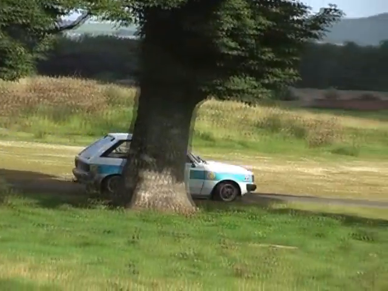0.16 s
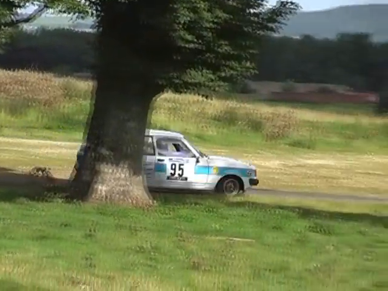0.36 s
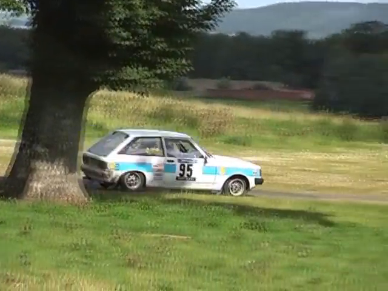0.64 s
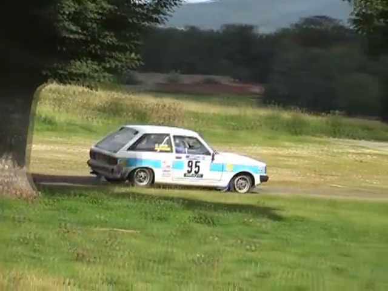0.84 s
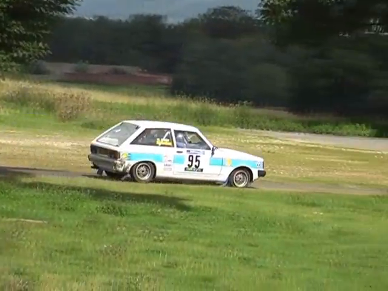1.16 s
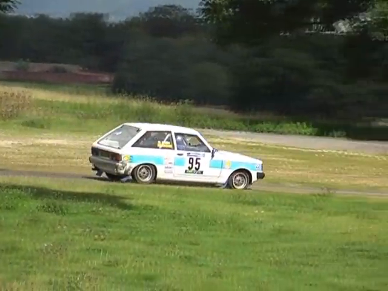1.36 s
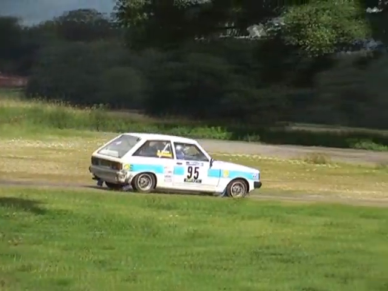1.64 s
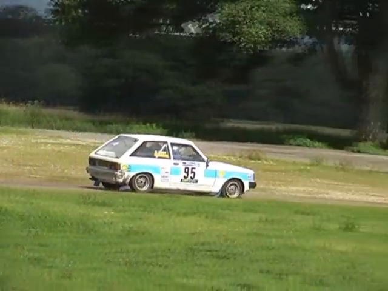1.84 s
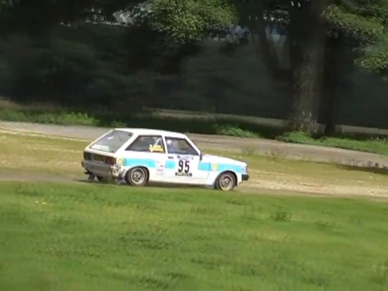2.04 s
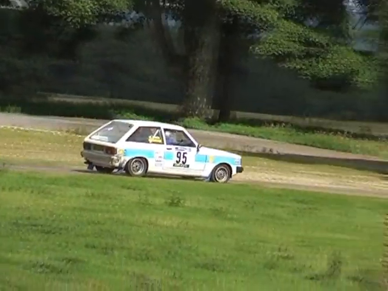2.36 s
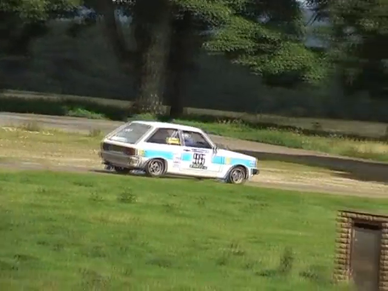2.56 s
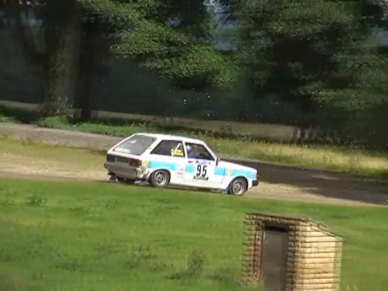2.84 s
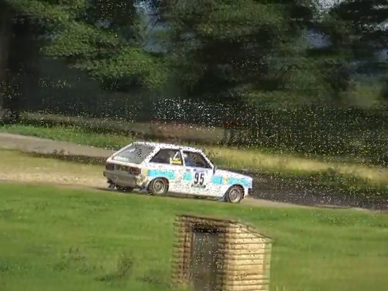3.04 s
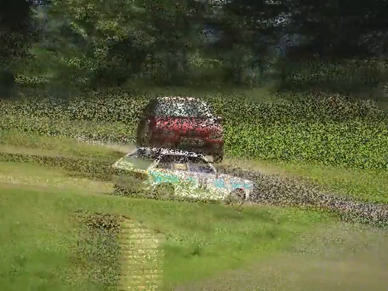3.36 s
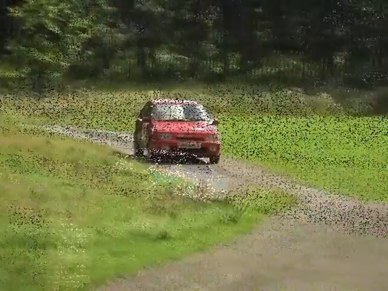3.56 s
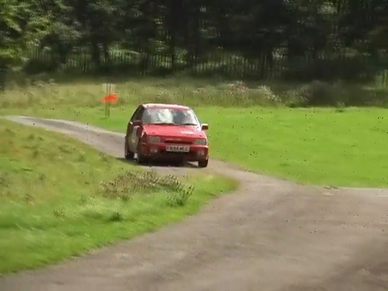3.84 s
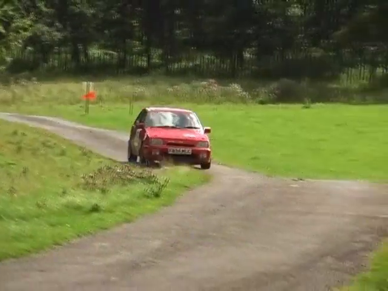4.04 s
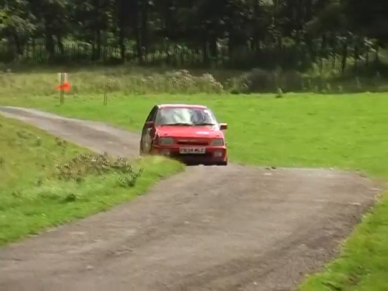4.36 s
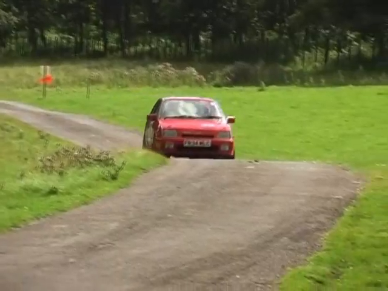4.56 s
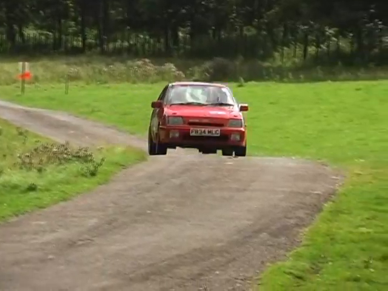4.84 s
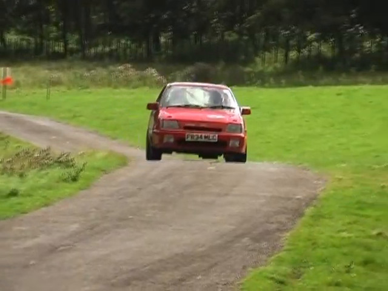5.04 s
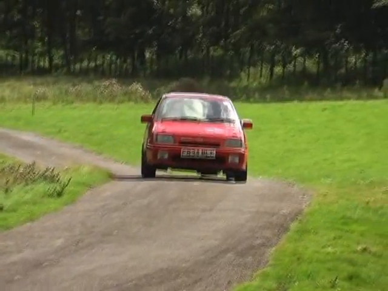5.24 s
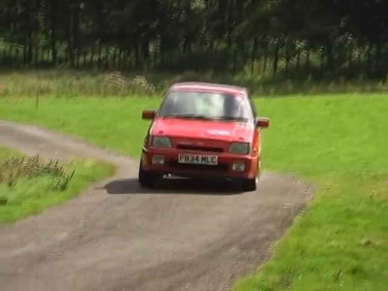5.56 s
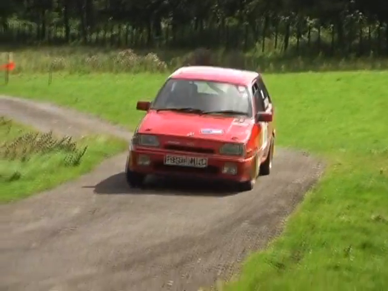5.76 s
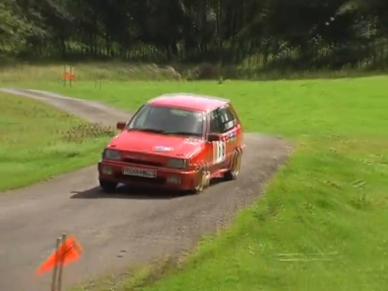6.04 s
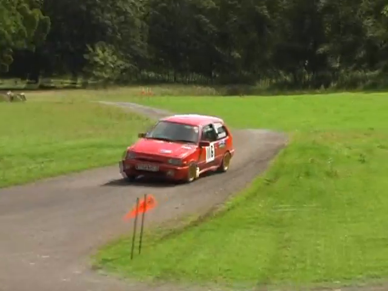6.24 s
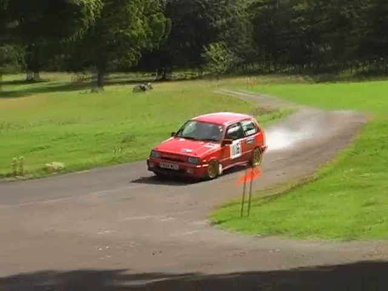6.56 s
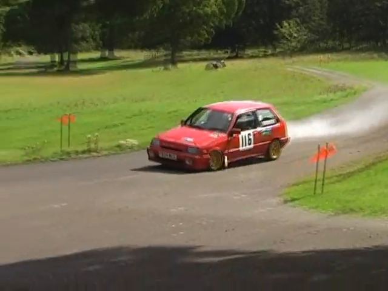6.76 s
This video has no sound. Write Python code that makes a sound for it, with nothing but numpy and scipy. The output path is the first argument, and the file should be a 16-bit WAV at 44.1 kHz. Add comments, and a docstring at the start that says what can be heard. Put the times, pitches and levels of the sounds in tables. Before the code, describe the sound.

A rally car crackles and surges away over gravel, then a second engine nears, lifts off, and its tyres scrub and squeal through a corner.

```python
"""A parkland rally stage: one car slides on gravel with surging revs and pulls away as a second comes on at full
throttle, lifts, brakes and scrubs its tyres into a tarmac corner with a squeal.
Engines are sums of tones locked to the firing rate plus ringing metal; the road and wind are coloured noise.
Stones are short cracks, squeals and yelps are brief tones. A camera microphone with two close ports hears it all."""
import sys
import numpy as np
from scipy import signal
from scipy.fft import rfft, irfft, next_fast_len
from scipy.io import wavfile
from scipy.ndimage import uniform_filter1d

SR = 44100
rng = np.random.default_rng(int(sys.argv[2]) if len(sys.argv) > 2 else 0)


def master_out(mix):
    """Clip the mix to full scale and print it as 16-bit PCM to the path in sys.argv[1]."""
    frames = np.transpose(np.atleast_2d(mix))
    ceiling = np.clip(frames, -1, 1)
    pcm = np.round(ceiling * 32767).astype(np.int16)
    wavfile.write(sys.argv[1], SR, pcm)


N = 304270
T = np.arange(N) / SR  # time of every sample, s
SIZE = next_fast_len(N)  # length of the Fourier transforms
SIDES = np.array([[1], [-1]])  # left, right


def undb(db):
    """Turn decibels into a gain."""
    return 10 ** (np.asarray(db) / 20)


def unit(x):
    """Scale to an RMS of 1."""
    return x / np.sqrt(np.mean(x ** 2))


def columns(table):
    """Every column after the time, as a curve over all samples."""
    s, *rest = np.transpose(table)
    return [np.interp(T, s, column) for column in rest]


def gate(table, fade_s):
    """1 while the table lasts, fading to 0 outside."""
    first, last = table[0][0], table[-1][0]
    return np.interp(T, [first - fade_s, first, last, last + fade_s], [0, 1, 1, 0])


def walk(rate):
    """Random levels, each held 1 / rate seconds, then smoothed twice; RMS 1."""
    k = int(SR / rate)
    steps = np.repeat(rng.standard_normal(N // k + 1), k)
    return unit(uniform_filter1d(uniform_filter1d(steps, k), k)[:N])


def response(shape, lo_hz, hi_hz, rings):
    """The part of a spectrum between two soft edges, with its resonances, passing unit power."""
    f = np.maximum(np.arange(SIZE // 2 + 1) * SR / SIZE, 1)
    hz, db = np.transpose(shape)
    edges = 1 / np.sqrt((1 + (lo_hz / f) ** 8) * (1 + (f / hi_hz) ** 8))
    lift_db = sum(top_db / (1 + (2 * (f - ring_hz) / width) ** 2) for ring_hz, width, top_db in rings)
    return unit(edges * undb(np.interp(np.log(f), np.log(hz), db) + lift_db))


def colour(x, shape, lo_hz, hi_hz, rings=()):
    """Filter unit noise, one row or several."""
    return irfft(rfft(x, SIZE) * response(shape, lo_hz, hi_hz, rings), SIZE)[..., :N]


def grains(rate, spread_db):
    """Scattered impacts of uneven size, about `rate` a second."""
    hit = rng.random(N) < rate / SR
    size_db = spread_db * np.minimum(rng.exponential(1, N), 4)
    return unit(hit * rng.standard_normal(N) * undb(size_db))


def firing_cycle(table):
    """Count of firings so far: the firing rate added up over time."""
    return np.cumsum(columns(table)[0]) / SR


# How unevenly the engines fire, rough when the throttle shuts.
# Each row: time in seconds, roughness from 0 to 1.
ROUGHNESS = [(0, .1), (.24, .1), (.3, .5), (.56, .45), (.62, .12), (1.05, .12), (1.15, .25), (1.3, .14),
             (2.1, .16), (2.5, .08), (4.2, .08), (4.3, .26), (5.1, .1), (5.6, .2)]


def exhaust(table, orders, half_db):
    """Multiples (orders) of the firing rate; firings differ in strength and timing, uneven cylinders add half orders."""
    rough, = columns(ROUGHNESS)
    cycle = firing_cycle(table)
    note = 0
    for k, db in orders:
        size, slip = (np.interp(cycle, np.arange(1500), c) for c in rng.standard_normal((2, 1500)))
        scatter = rough * min(0.33 * k, 1)  # the lowest order averages over the whole pulse
        strength = undb(db) * (1 + 2.15 * scatter * size)
        note = note + strength * np.sin(2 * np.pi * k * cycle + 3.05 * scatter * slip)
    body = np.sqrt(sum(undb(db) ** 2 for k, db in orders))
    for k in (1.5, 2.5, 3.5):
        size, slip = (np.interp(cycle / 2, np.arange(800), c) for c in rng.standard_normal((2, 800)))
        note = note + body * undb(half_db + 5.4 * rough) * size * np.sin(2 * np.pi * k * cycle + slip)
    note = np.sqrt(2) * note * gate(table, 0.051)
    # short tail pipes radiate little below their first order
    return signal.sosfilt(signal.butter(4, 62, "high", fs=SR, output="sos"), note)


def rasp(cycle, table, box, spread_db):
    """Each firing is a knock of its own strength that rings hollow metal; the rattle comes and goes."""
    size = rng.standard_normal((1500, 2))[cycle.astype(int)].T
    fires = np.diff(np.floor(cycle), prepend=0) > 0
    knocks = fires * undb(spread_db * size[0])
    puff = rng.standard_normal(N) * np.exp(-(cycle % 1) / 0.54)  # noise fading after each firing
    knocks = knocks + 0.11 * puff * undb(spread_db * size[1])
    ring = 0
    for hz, width, db in box:
        ring = ring + undb(db) * unit(signal.lfilter(*signal.iirpeak(hz, hz / width, fs=SR), knocks))
    return unit(ring) * undb(columns(table)[0]) * undb(3.6 * walk(30)) * gate(table, .05)


# The engine of the leaving car.
# Each row: time in seconds, firing rate in Hz, level in dB before the pipe, lift of the 2nd order in dB.
LEAVING_REVS = [(0.0, 89.9, -38.5, 18.5), (0.136, 116.9, -20, 2.5), (0.222, 137, -29.5, 13.5),
                (0.27, 136.8, -29, -16), (0.434, 138.7, -32, -2), (0.54, 150, -26.5, 4),
                (0.64, 161.2, -22.5, 7.5), (0.72, 151.1, -22.5, 0.5), (0.792, 125.3, -25, 6.5),
                (0.898, 112.4, -21, 7), (1.062, 81, -30, 14.5), (1.14, 66.8, -22, -4),
                (1.2, 71.74, -24, 3.5), (1.26, 79.2, -25, 7.5), (1.408, 87.8, -29.5, 9.5),
                (1.506, 92.54, -17, 0.5), (1.68, 74.7, -28.5, 11), (1.834, 88.4, -19, -0.5),
                (1.996, 79.5, -26, 11.5), (2.084, 93.2, -16.5, -11.5), (2.2, 87.3, -21, -1.5),
                (2.33, 91.6, -16.5, -13), (2.544, 96.75, -17.5, 4), (2.832, 103.4, -18.5, -7),
                (3.128, 110.9, -23, -9.5), (3.3, 115.4, -24.5, 5), (3.4, 117, -24, -4),
                (3.798, 126.5, -28.5, 4.5), (4.06, 134.9, -42.5, 4)]
# The throttle is lifted for an instant. Each row: middle in seconds, length in seconds, change in dB.
THROTTLE_LIFTS = [(.28, 0.071, -10), (0.422, 0.11, -12), (1.143, 0.078, -7), (1.436, 0.058, -16)]
# Extra level of the orders above the third. Each row: time in seconds, gain in dB.
UPPER_ORDERS = [(0, -1), (.45, -3), (.6, 8), (.8, 1), (1.2, -3.5), (2, 1.5), (2.5, 3), (3.0, 5), (3.5, 1.5),
                (4.06, 6)]
# How well the pipe passes an order. Each row: frequency of the order in Hz, gain in dB.
PIPE_GAIN = [(60, 1), (85, -15), (110, -5.5), (140, -2.5), (170, -3), (205, -4), (240, -0.4), (280, -4.5),
             (320, -9.5), (370, -23), (500, -32), (640, -37), (780, -36.5), (920, -65)]


def leaving_orders(count):
    """Each order is as loud as the pipe passes it at its frequency; all drop when the throttle is lifted."""
    hz, db, second_db = columns(LEAVING_REVS)
    for s, length, depth_db in THROTTLE_LIFTS:
        db = db + depth_db * np.exp(-((T - s) / length * 2) ** 2)
    bright_db, = columns(UPPER_ORDERS)
    pipe_hz, pipe_db = np.transpose(PIPE_GAIN)
    orders = []
    for k in range(1, count + 1):
        passed_db = np.interp(np.log(k * hz), np.log(pipe_hz), pipe_db)
        orders.append((k, db + passed_db + (k == 2) * second_db + (k > 3) * bright_db))
    return orders


# Rasp of the firings in the silencer and engine bay. Each row: time in seconds, level in dB.
LEAVING_RASP_LEVEL = [(0, -56), (.45, -60), (.52, -40), (.74, -40), (.82, -42), (1.0, -48), (1.15, -54),
                      (1.8, -59), (2.2, -46.5), (3, -53), (3.8, -68)]
# The metal that rings. Each row: pitch in Hz, width in Hz, strength in dB against the other rings.
LEAVING_METAL = [(770, 32, 5.1), (1090, 65, 1.3), (1341, 52, 7), (1603, 87, 1.3)]


def leaving_engine():
    """The leaving car: exhaust orders and the rasp of metal struck at the same firing rate."""
    note = exhaust(LEAVING_REVS, leaving_orders(count=8), half_db=-37.0)
    return note + rasp(firing_cycle(LEAVING_REVS), LEAVING_RASP_LEVEL, LEAVING_METAL, spread_db=4.4)


# The engine of the coming car.
# Each row: time in seconds, firing rate in Hz, exhaust level in dB, intake howl in dB.
COMING_REVS = [(2.95, 147.2, -47, -67), (3.172, 146.8, -39, -55), (3.554, 151.1, -28, -58),
               (3.8, 154.7, -25.5, -53), (4.112, 155.1, -20, -43.5), (4.22, 155.7, -25.5, -39),
               (4.25, 155.7, -45, -43), (4.346, 152.4, -34, -50), (4.568, 152.4, -44.5, -51.5),
               (4.9, 147.6, -40, -55), (5.05, 140.8, -33.5, -62), (5.22, 133.4, -32, -66),
               (5.29, 126.9, -24, -65), (5.37, 121, -33, -64), (5.492, 112.2, -35, -63),
               (5.6, 105, -45, -66), (5.72, 97.6, -36.5, -66), (5.9, 89.3, -60, -64)]

# Both cars on gravel, then rolling on tarmac.
# Each row: time in seconds, level in dB, lower middle over it in dB, treble over it in dB (scaled per layer).
ROAD_LEVEL = [(0, -50, 3.5, -3), (.23, -46, 3, -8.5), (.39, -44.5, -3, -6), (.52, -41, 2.5, -5.5),
              (.7, -41.5, 3.5, -6.5), (.98, -41, 1, -6), (1.15, -47, 1, -7), (1.57, -43, 1, -3),
              (1.74, -46.5, 0.5, -3), (1.77, -38.5, -1, -5.5), (1.96, -45, 2.5, -6), (2.01, -48, 1.5, 0),
              (2.06, -43, 3, -6), (2.7, -45, 1.5, -5), (2.9, -46, 2, -9.5), (3.61, -49, 3, -9),
              (4.18, -46, 6, -16), (4.36, -47.5, 3.5, -15), (4.8, -46.5, 4, -15.5), (5.07, -40.5, 1, -11.5),
              (5.4, -35.5, -0.5, -10.5), (5.58, -38, 2, -14.5), (5.81, -35.5, 0.5, -15),
              (5.86, -30, 1.5, -18)]
# The coming car sliding into the corner. Each row: the same four columns.
SKID_LEVEL = [(5.87, -30, -4, -18), (5.884, -23, -4, -21.5), (5.966, -27, -1, -12.5),
              (6.004, -21, -6.5, -16), (6.012, -29.5, 0, -15.5), (6.106, -28.5, 0, -10.5),
              (6.138, -32, 0, -3.5), (6.204, -28.5, 3, -5), (6.308, -25.5, 1, -6), (6.328, -20.5, -11, -16),
              (6.348, -29.5, 3, -7.5), (6.434, -26, 3.5, -10), (6.584, -34, 7, -5), (6.642, -31, 1.5, -7),
              (6.762, -30, 2, -4), (6.792, -27, -4, -8), (6.84, -29.5, 1, -13), (6.9, -35.5, 12.5, -5)]
# The deep rumble. Each row: time in seconds, level in dB.
RUMBLE_LEVEL = [(0, -33), (.3, -31), (.54, -36.5), (.94, -31), (1.5, -32), (1.76, -29.5), (2, -33),
                (2.87, -29), (3.6, -38), (5.4, -38.5), (5.58, -34), (5.81, -34), (5.88, -32), (6.02, -34.5),
                (6.2, -26.5), (6.5, -28), (6.7, -33.5), (6.9, -31.5)]
# Colours of the noise: the rumble, then the road on gravel, rolling on tarmac and sliding on tarmac.
# Each row: frequency in Hz, relative strength per Hz in dB.
RUMBLE_COLOUR = [(18, -51), (30, -42), (64, -8), (96, 1), (192, 9), (333, 2.5), (600, -10.5)]
GRAVEL_COLOUR = [(260, -48), (450, -16), (499, -2), (662, 0), (791, -5), (878, -6), (1030, -3), (1330, -5),
                 (1790, -7.5), (2670, -6), (3600, -14), (7020, -20.5), (7780, -27.5), (11000, -25.5),
                 (15600, -38)]
ROLLING_COLOUR = [(260, 3), (450, 0.5), (606, -11.5), (672, -7.5), (918, -8), (1110, -4.5), (1820, -13),
                  (2110, -10.5), (3990, -22), (6140, -21), (8020, -30.5), (9730, -27), (13100, -33),
                  (14100, -40), (15600, -48)]
SLIDING_COLOUR = [(260, 15), (450, 3), (588, -7.5), (682, -2), (1080, -1), (1230, -6), (3440, -15),
                  (3990, -14), (4560, -16), (5700, -16), (7900, -23.5), (12200, -20), (15600, -31)]
# Rings of hollow bodywork in the road noise. Each row: pitch in Hz, width in Hz, lift in dB.
GRAVEL_BODY = [(800, 35, 2.5), (1387, 53, 3.5), (2710, 200, 3)]
ROLLING_BODY = [(1110, 34, 2.7), (9900, 550, 3)]


def road():
    """Rumble and four bands of tread roar; bumps and showers of grit shake them, exhaust gas pulses the lower two."""
    tarmac_s, slide_s, turn_s = 3.88, 5.86, 5.97  # middle of the change to tarmac, start of slide, start of turn
    tarmac = np.clip(T - tarmac_s + .5, 0, 1)
    slide = np.clip((T - slide_s) / 0.016, 0, 1)
    turn = np.clip((T - turn_s) / 0.25, 0, 1)
    loose = 1 - 0.63 * tarmac * (1 - slide)  # rolling on tarmac is shaken least
    road_db, lower_db, treble_db = columns(ROAD_LEVEL + SKID_LEVEL)
    rumble_db, = columns(RUMBLE_LEVEL)
    bumps = walk(8.7)
    grit_tail = np.exp(-1 / (0.0098 * SR))  # each shower of grit dies away in about 10 ms
    showers = unit(signal.lfilter([1], [1, -grit_tail], np.abs(grains(70, 2.8))))
    leaving_gas = 1 + 0.066 * (1 - slide) * np.cos(2 * np.pi * firing_cycle(LEAVING_REVS))
    coming_gas = 1 + 0.077 * (1 - slide) * np.cos(2 * np.pi * firing_cycle(COMING_REVS))
    mid, side = colour(rng.standard_normal((2, N)), RUMBLE_COLOUR, 20, 444)
    out = undb(rumble_db + 0.34 * walk(13)) * (mid + undb(-22.5) * side * SIDES)
    # Scrub, hiss, spray and grit. Each row: added level in dB, then its offsets in dB on gravel, rolling and
    # sliding, edges in Hz, impacts a second, their share when sliding, bumps in dB, showers' share,
    # side against middle in dB, left minus right in dB
    layers = [
        (lower_db, (0.69, 0.93, 2.1), 500, 1850, 350, .65, .4, .06, -21, -.2),
        (0, (-2.3, -2.2, -2.1), 1850, 3900, 700, .5, .4, .12, -16, -.6),
        (0.73 * treble_db, (-1.8, -3.3, -3.6), 4000, 7500, 1200, .5, .4, .22, -6.5, -.3),
        (1.47 * treble_db, (-1.4, -1, -0.89), 7500, 17000, 700, .8, .4, .3, -6.5, 2.2)]
    for over_db, offsets_db, lo_hz, hi_hz, rate, share, bump_db, shower, side_db, lean_db in layers:
        gravel_db, rolling_db, sliding_db = offsets_db
        surface_db = gravel_db + (rolling_db - gravel_db) * tarmac + (sliding_db - rolling_db) * slide
        db = road_db + over_db + surface_db
        rush = rng.standard_normal((2, N))
        impacts = np.array([grains(rate, 0.44), grains(rate, 1.5)])
        crunch = (rush + share * impacts) / np.sqrt(1 + share ** 2)
        pulse = (leaving_gas, coming_gas) if hi_hz < 5000 else (1, 1)
        on_gravel = colour(rush * pulse[0], GRAVEL_COLOUR, lo_hz, hi_hz, GRAVEL_BODY)
        rolling = colour(rush[:, ::-1] * pulse[1], ROLLING_COLOUR, lo_hz, hi_hz, ROLLING_BODY)
        # the road mirrors the sliding tyres, leaving a dip (Hz, width in Hz, dB) that is higher after the turn
        before_turn = colour(crunch, SLIDING_COLOUR, lo_hz, hi_hz, [(3800, 440, -14)])
        after_turn = colour(crunch, SLIDING_COLOUR, lo_hz, hi_hz, [(4080, 260, -9)])
        mid, side = (np.sqrt(1 - tarmac) * on_gravel + np.sqrt(tarmac) * (1 - slide) * rolling
                     + slide * (1 - turn) * before_turn + turn * after_turn)
        shake = undb(loose * bump_db * bumps) * (1 - shower * loose + shower * loose * showers)
        out = out + (mid + undb(side_db) * side * SIDES) * shake * undb(db + lean_db / 2 * SIDES)
    return out


# Strength of the wind. Each row: time in seconds, level in dB of the part both ports share.
WIND_LEVEL = [(0, -52), (2.5, -57), (5.2, -68), (6, -57), (6.5, -48), (6.9, -46)]


def wind():
    """Slow low buffeting as deep noise, partly different at the two ports."""
    db, = columns(WIND_LEVEL)
    mid, side = colour(rng.standard_normal((2, N)), [(10, -2), (40, 2), (90, 1.2)], 8, 89)
    return undb(db) * (mid + .5 * side * SIDES)


# Single firings popping in the pipe while the throttle is shut.
# Each row: start in seconds, peak in dB, ring in Hz.
PIPE_POPS = [(0.315, -18, 166), (.335, -24, 170), (.36, -25, 172), (.404, -23, 151), (.446, -24, 190),
             (.476, -21, 150), (0.522, -15, 200), (.561, -17, 200)]


def pops():
    """Each pop swells within a cycle and rings out in the pipe."""
    out, t = np.zeros(N), np.arange(3000) / SR
    for s, db, hz in PIPE_POPS:
        turns = hz * t / 1.6  # a longer swell for a larger divisor
        swell = 2 * turns * np.exp(1 - 2 * turns)
        out[int(s * SR):int(s * SR) + 3000] += undb(db) * swell * np.sin(2 * np.pi * hz * t)
    return out


# Brake squeaks. Each row: middle in seconds, peak in dB, pitch in Hz, length in seconds.
BRAKE_SQUEAKS = [(0.458, -47.5, 10300, 0.037), (5.42, -46, 13980, 0.029)]


def squeaks(waver):
    """Brief brake whistles that swell and fade, with an unsteady pitch."""
    drift = np.cumsum(1 + waver * walk(150)) / SR
    out = 0
    for s, db, hz, length in BRAKE_SQUEAKS:
        swell = np.exp(-((T - s) / length * 2) ** 2)
        out = out + undb(db) * swell * np.sin(2 * np.pi * hz * drift)
    return out


# Thrown stones. Each row: start in seconds, level in dB, ring in Hz, left minus right in dB.
THROWN_STONES = [(0.495, -32, 5030, 0.5), (1.0985, -30, 5700, -2), (1.2263, -37, 4500, 0.5),
                 (1.6708, -35, 4786, 1.0), (1.737, -31, 10800, 1.5), (1.7603, -34, 4900, -2),
                 (1.8497, -33, 5000, 0.0), (1.9015, -34, 5650, 0.0), (2.0072, -33, 4360, 1.0),
                 (2.139, -38, 4310, -0.5), (2.6845, -33, 4614, 0.5), (2.8335, -30, 7130, 4),
                 (3.52, -39.5, 6950, 4), (5.8236, -41, 4500, -7), (6.121, -19, 4640, 2),
                 (6.166, -19, 5800, -1), (6.307, -25, 6160, -.6), (6.736, -19.5, 4300, -2),
                 (6.863, -20.5, 5100, -1.5)]


def stones():
    """Each stone cracks on the bodywork: a short hiss and a damped ring."""
    out, t = np.zeros((2, N + 2000)), np.arange(2000) / SR
    band = signal.butter(1, [3500, 11000], "band", fs=SR)
    hisses = signal.lfilter(*band, rng.standard_normal((len(THROWN_STONES), 2, 2000)))
    for (s, db, hz, pan_db), hiss in zip(THROWN_STONES, hisses):
        burst = (hiss[0] + .5 * hiss) * 0.55 * np.exp(-t / 0.0035)
        ring = 0.39 * np.sin(2 * np.pi * hz * t) * np.exp(-t / 0.0067)
        out[:, int(s * SR):int(s * SR) + 2000] += (burst + ring) * undb(db + pan_db / 2 * SIDES)
    return out[:, :N]


# Low orders of the coming car. Each row: order, gain in dB over the exhaust level.
EXHAUST_ORDERS = [(1, 0), (2, -20.5)]
# Its high orders. Each row: order, gain in dB over the intake howl.
HOWL_ORDERS = [(3, -6), (4.5, -3), (5, -6), (5.5, -4.5)]


def coming_orders():
    """Low orders follow the exhaust level, high ones the intake howl."""
    hz, db, howl_db = columns(COMING_REVS)
    low = [(k, db + gain_db) for k, gain_db in EXHAUST_ORDERS]
    return low + [(k, howl_db + gain_db) for k, gain_db in HOWL_ORDERS]


# Rasp of the coming car. Each row: time in seconds, level in dB.
COMING_RASP_LEVEL = [(3.6, -63), (4.2, -46.5), (4.35, -55), (4.6, -46), (5.1, -45.5), (5.35, -42),
                     (5.75, -43), (5.9, -57)]
# The metal that rings. Each row: pitch in Hz, width in Hz, strength in dB against the other rings.
COMING_METAL = [(1040, 68, -5), (1140, 50, 3.5), (1393, 32, 0.5)]


def coming_engine():
    """The coming car: exhaust and intake orders and the rasp of metal struck at the same firing rate."""
    note = exhaust(COMING_REVS, coming_orders(), half_db=-28.0)
    return note + rasp(firing_cycle(COMING_REVS), COMING_RASP_LEVEL, COMING_METAL, spread_db=3.8)


# Tyre squeals and yelps; the first row is the coming engine's fourth order, falling with its revs.
# Each row: start in seconds, length in seconds before the release, level in dB, pitch from in Hz, pitch to in Hz.
SQUEALS_AND_ORDER = [(5.689, .08, -33, 372, 345), (5.884, 0.028, -27, 835, 818),
                     (5.885, 0.028, -24.5, 1590, 1530), (5.953, 0.051, -21.5, 905, 877),
                     (5.966, .03, -23, 1110, 1100), (5.994, 0.0077, -16.5, 1580, 1560),
                     (6.172, 0.058, -23, 686, 697), (6.232, .02, -22, 1044, 1060),
                     (6.241, 0.027, -22, 680, 732), (6.316, 0.013, -20, 1570, 1605),
                     (6.322, .01, -20, 2140, 2130), (6.414, 0.032, -25, 968, 1033),
                     (6.454, 0.034, -22, 800, 800), (6.5, 0.024, -22, 1003, 970),
                     (6.59, .031, -13.5, 1014, 996), (6.626, 0.027, -13, 1018, 1047),
                     (6.659, 0.0082, -15, 1040, 1014), (6.681, 0.04, -20, 1087, 1053),
                     (6.727, 0.021, -16.5, 1168, 1140), (6.752, 0.022, -19, 1110, 1110),
                     (6.777, 0.013, -13, 977, 954), (6.792, .005, -9, 1030, 1014),
                     (6.798, 0.019, -18.5, 977, 1084)]


def squeal():
    """Tread blocks stick and slip near one pitch, with a weaker neighbour above; one engine order is made alike."""
    attack_s, release_s = 0.00096, 0.0047
    pitch_waver, catch_depth = 0.032, 0.4  # shares of the pitch and of the loudness
    out, t = np.zeros(N + SR), np.arange(int(.2 * SR)) / SR
    chance = np.array([walk(260), walk(220)])
    for s, length, db, from_hz, to_hz in SQUEALS_AND_ORDER:
        grip = undb(db) * np.clip(t / attack_s, 0, 1) * np.exp(-np.clip(t - length, 0, 1) / release_s)
        glide_hz = np.interp(t, [0, length], [from_hz, to_hz])
        for ratio, part_db in ((1, -2), (1.2, -11)):
            # every tone takes its own random stretch of the two walks
            waver, catch = chance[:, rng.integers(N - len(t)):][:, :len(t)]
            phase = 2 * np.pi * np.cumsum(ratio * glide_hz * (1 + pitch_waver * waver)) / SR
            # catching and letting go
            hold = np.clip(1 + catch_depth * catch * np.minimum(t / 0.016, 1), 0, None)
            tone = hold * (np.sin(phase) + undb(-19) * np.sin(2 * phase))
            out[int(s * SR):int(s * SR) + len(t)] += undb(part_db) * grip * tone
    return out[:N]


def yelps(count):
    """Single tread blocks give short ragged tones of any pitch, following the slide's level, stronger when low."""
    low_hz, high_hz, length_cycles = 596, 6380, 14
    level_db, spread_db = -3.5, 3  # against the slide, and between yelps
    start, end = SKID_LEVEL[0][0], SKID_LEVEL[-1][0]
    out, t = np.zeros(N + SR), np.arange(3000) / SR
    for when, pitch, size, bend in rng.random((count, 4)):
        turns = low_hz * (high_hz / low_hz) ** pitch * t
        swell = turns / length_cycles * np.exp(-2 * turns / length_cycles)
        tone = swell * np.sin(2 * np.pi * turns * (1 + 0.003 * (bend - .5) * turns))
        at = int((start + when * (end - start)) * SR)
        out[at:at + 3000] += tone * undb(-spread_db * np.log(1 - size) - 11 * pitch)
    out = out[:N]
    return out / np.std(out[int(start * SR):]) * undb(columns(SKID_LEVEL)[0] + level_db)


# Where the cars sit. Each row: time in seconds, left minus right in dB.
CAR_PAN = [(0, 0), (3, 0), (4.2, -0.7), (6.9, 0)]


def scene():
    """Engines and tyre tones sit in the middle; the two ports hear them slightly unequally, a little out of phase."""
    middle = leaving_engine() + coming_engine() + pops() + squeal() + yelps(count=560)
    # a small phase difference: a faint shifted part, of opposite sign at the two ports
    mismatch = undb(-23.0) * np.roll(middle, 62) * -SIDES
    pan = undb(columns(CAR_PAN)[0] / 2 * SIDES)
    cars = (middle + mismatch + road()) * pan
    return cars + stones() + squeaks(waver=0.0071) + wind()


def record(dry):
    """The microphone hisses faintly and loses the deep bass, the loudest peaks are rounded and the top is cut."""
    hissing = dry + undb(-61) * rng.standard_normal(dry.shape)
    thin = signal.sosfilt(signal.butter(2, 45, "high", fs=SR, output="sos"), hissing)
    rounded = np.tanh(1.3 * thin) / 1.3
    top_hz = 15650
    return signal.sosfilt(signal.ellip(10, .2, 70, top_hz, fs=SR, output="sos"), rounded)


dry = scene()
out = record(dry)
master_out(out)
```